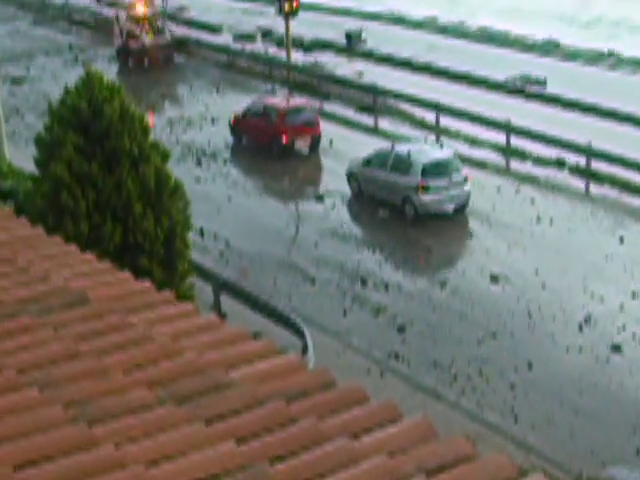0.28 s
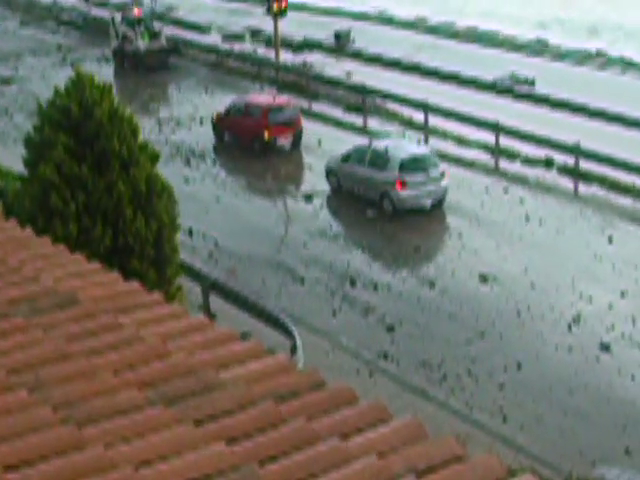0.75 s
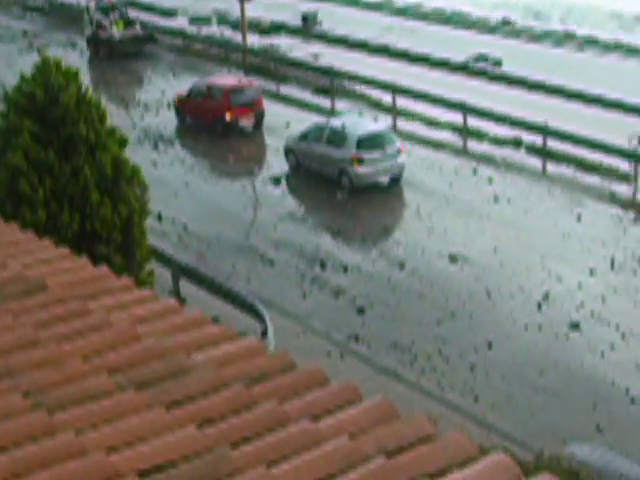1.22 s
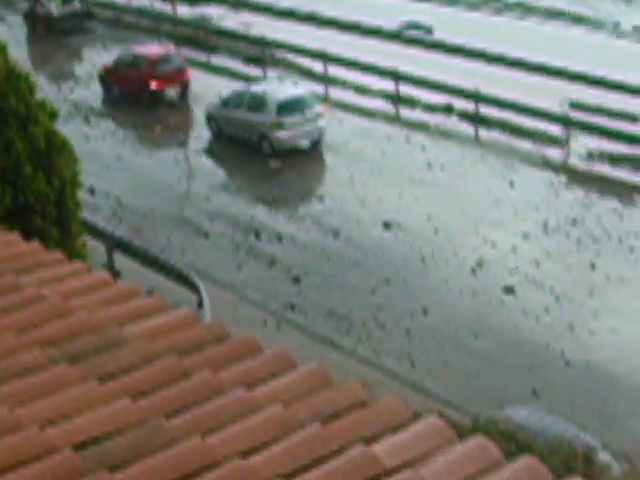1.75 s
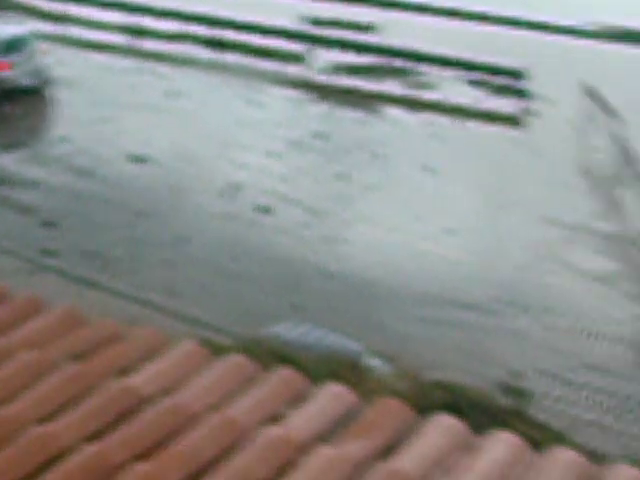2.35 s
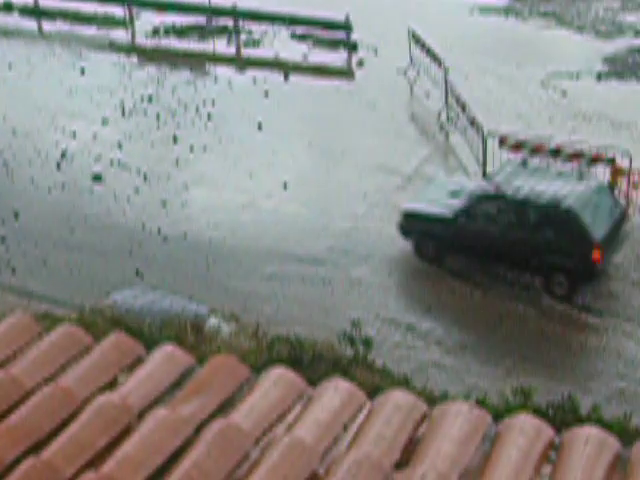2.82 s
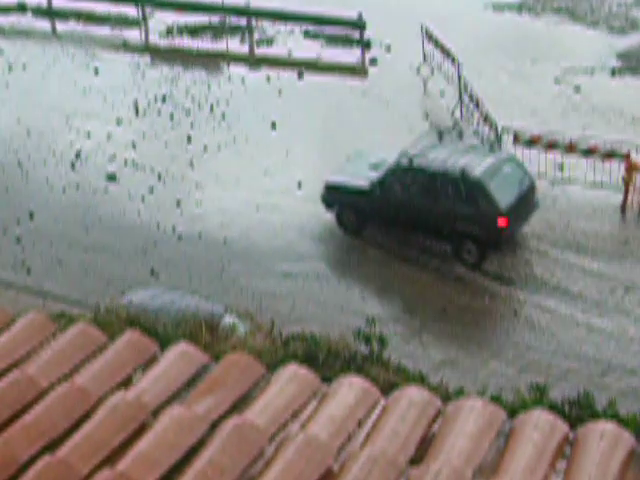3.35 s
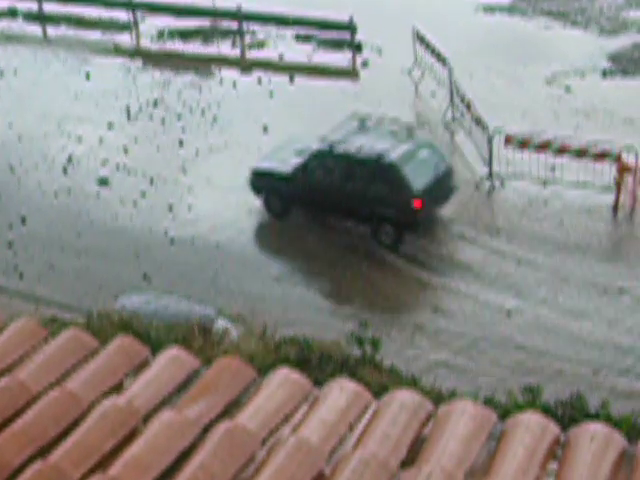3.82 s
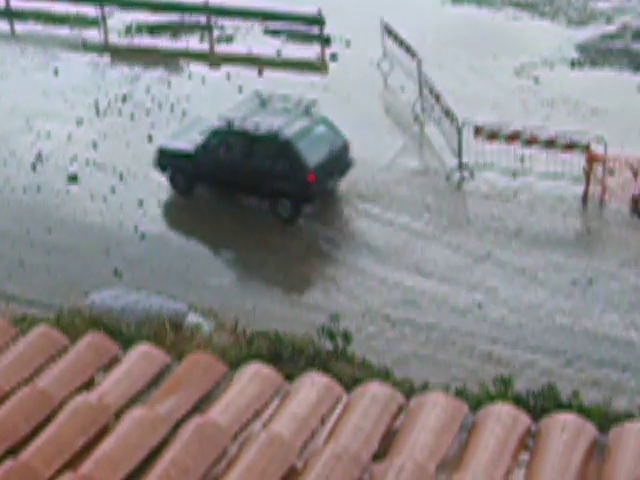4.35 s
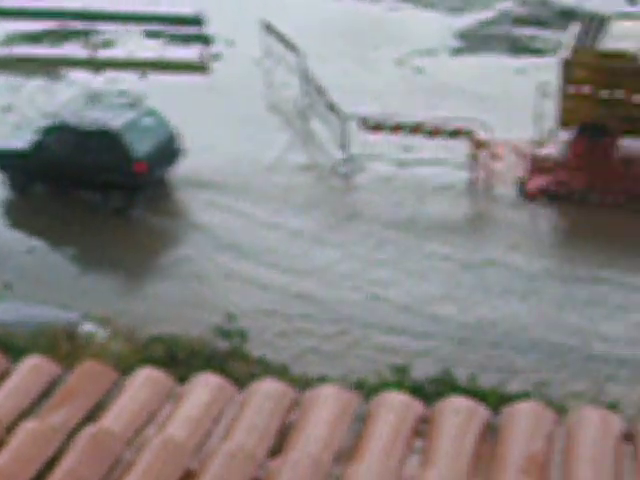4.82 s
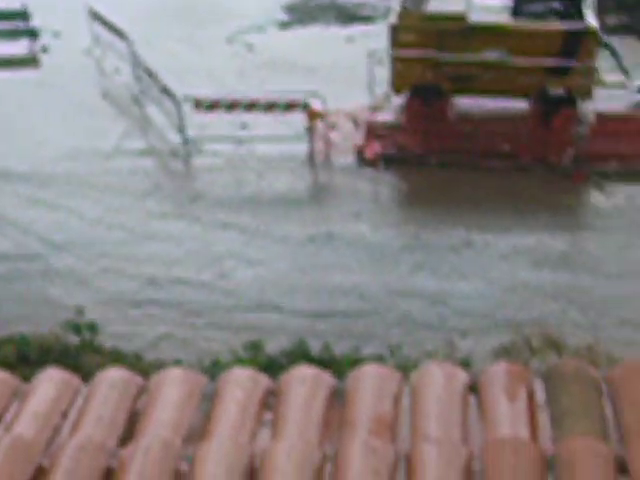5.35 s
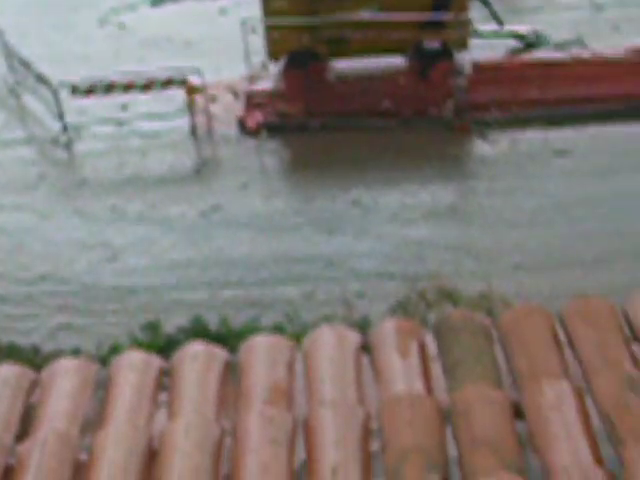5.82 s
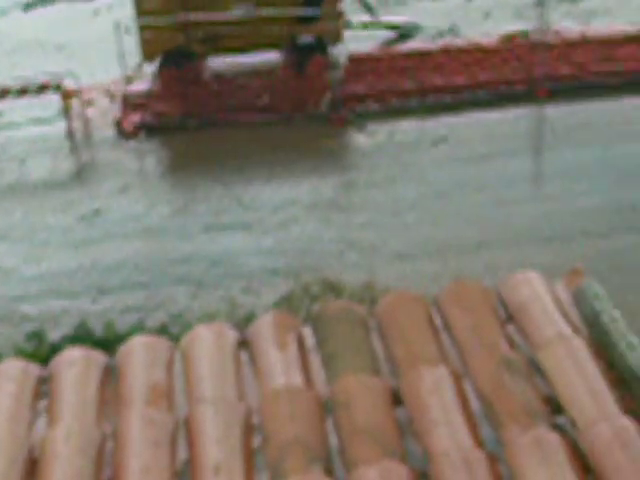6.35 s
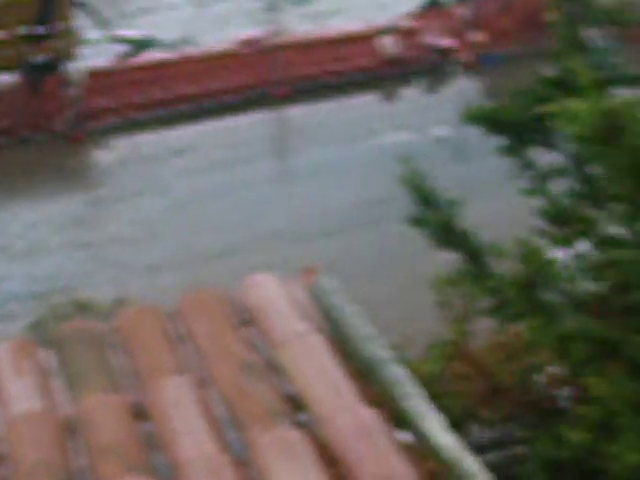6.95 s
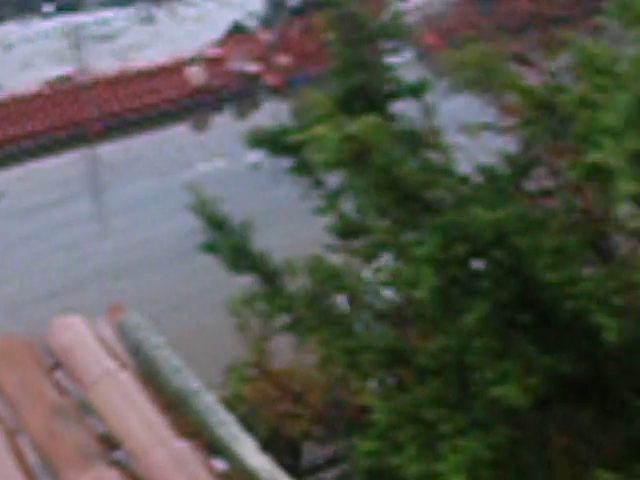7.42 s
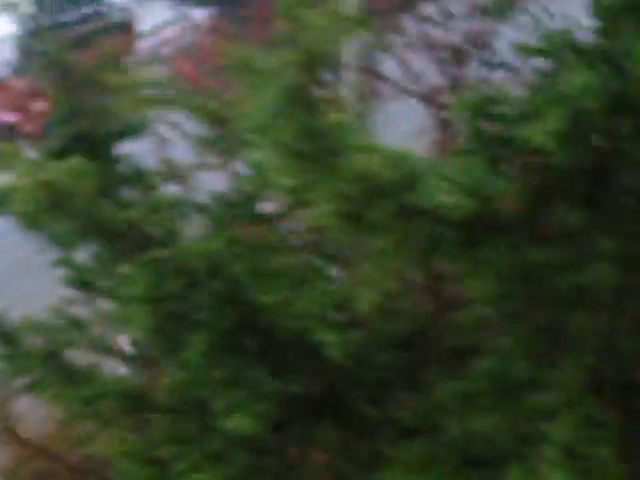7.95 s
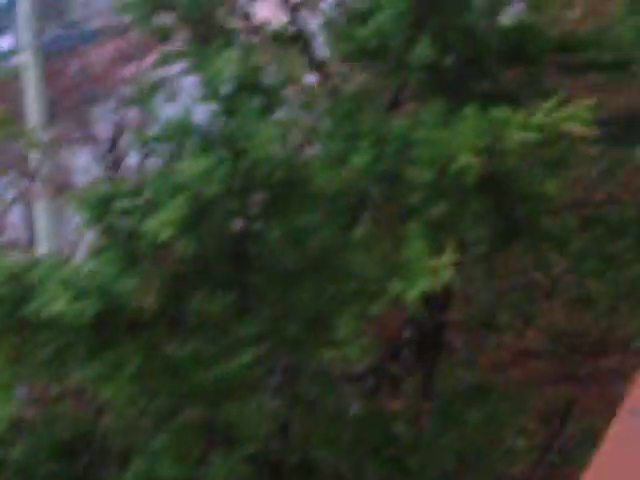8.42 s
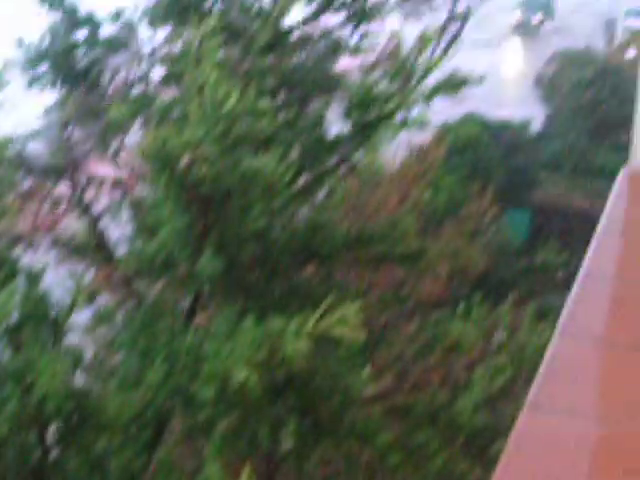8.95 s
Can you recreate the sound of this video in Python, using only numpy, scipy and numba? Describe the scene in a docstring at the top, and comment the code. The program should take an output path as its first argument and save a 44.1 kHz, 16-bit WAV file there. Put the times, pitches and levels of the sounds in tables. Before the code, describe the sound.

Storm surf roars continuously from 0 to about 9.2 s, a thick low-mid rush with deep rumble, seething foam and fine hiss, never falling silent. The spray hiss is strongest in the first second, then recedes. Small surges tumble through at 0.6 to 1.7 s; the sea eases slightly from 2 to 3.3 s. A faint low car engine hum lies underneath, and thin wavering wind whistles in railings appear at the start, from about 1.3 to 6.8 s, and again near 8.7 s. At 3.65 s a broad wave swells against the wall. A short metallic clank, a close double knock, rings at 4.25 s. Quick watery slams follow at 4.7, 4.9, 5.05 (the hardest) and 5.25 s. Rapid surges continue to 7 s, with foam growing brighter towards 8 s. A very short, sharp drop tick comes close by at 8.5 s. The microphone is dull, narrow-band mono, limiting on peaks.

```python
"""Storm surf roars against a seafront wall: waves tumble over one after another on a slow swell.
Shaped noise and random drops make breaker rumble, roar, foam, tyre spray and slams on the wall.
Wavering tones make an engine hum and gusts whistle in the railings.
Metal clanks in decaying modes and a drop ticks close by, a very short sine.
A narrow-band microphone, a peak limiter and a clipper shape the sum."""
import sys
import numpy as np
from scipy import signal
from scipy.fft import rfft, irfft
from scipy.io import wavfile
from scipy.ndimage import uniform_filter1d
from numba import njit

SR = 44100
rng = np.random.default_rng(int(sys.argv[2]) if len(sys.argv) > 2 else 0)


def store_wav(level_fs):
    """Save 16-bit WAV to argv[1]."""
    pcm = np.round(np.clip(np.atleast_2d(level_fs), -1, 1) * 32767)
    wavfile.write(sys.argv[1], SR, pcm.T.astype(np.int16))


N = 405279
TIME_S = np.arange(N) / SR

# slow swell of the sea: start_s, roar_db, rumble_db, foam_db
SWELL = [(0, -15.5, -20, -23), (.42, -17.5, -21, -26.5), (1.05, -15, -17.5, -27), (1.45, -17, -20.5, -29),
         (2.1, -18.5, -23.5, -29), (2.95, -18, -22.5, -27.5), (3.33, -18, -23, -28.5),
         (3.64, -13.5, -17, -27.5), (4.0, -15.5, -17.5, -27), (4.58, -17.5, -19.5, -28),
         (5.15, -17, -18.5, -26.5), (5.65, -15.7, -18.5, -25), (7.1, -15.5, -20, -23.5),
         (8.1, -16.5, -20.5, -22), (8.45, -17, -20, -23.5), (9.19, -16, -19.5, -21.5)]
# single waves tumbling over on the swell: crest_s, rise_db
SURGES = [(.6, 1), (1.02, 1.5), (1.22, 1.5), (1.65, 1.5), (3.76, 2), (4.03, 1), (4.21, 2.5), (4.42, 1.5),
          (4.681, 3), (4.86, 2.5), (5.02, 2.5), (5.28, 2.5), (5.46, 2), (5.8, 2.5), (5.96, 0.5),
          (6.15, 3.5), (6.52, 2), (6.899, 2.5), (7.29, 1), (7.47, 1), (7.74, 0.5), (8.101, 1.5), (8.45, 1),
          (8.65, 2), (8.98, 2.5)]
SURGE_BUILD_S, SURGE_FALL_S = 0.053, 0.054
# spectrum of heavy breakers: freq_hz, gain_db
RUMBLE_COLOUR = [(20, -48), (35, -27), (48, -22), (75, -13), (110, -6), (160, -4.5), (240, 2), (330, 0),
                 (450, -3.5), (700, -19), (1500, -42.5), (4000, -80.5)]
# spectrum of broken surf: freq_hz, gain_db
ROAR_COLOUR = [(30, -57), (150, -27), (320, -7.5), (460, -4.5), (580, 1.5), (760, 0), (920, -3),
               (1100, -6.5), (1350, -21), (2000, -23), (4000, -51.5)]
# spectrum of foam on the road: freq_hz, gain_db
FOAM_COLOUR = [(50, -50), (600, -25.5), (1000, -3.5), (1250, 0.5), (1420, -2), (1580, -0.5), (1850, -3.5),
               (2150, -5), (2600, -7.5), (3200, -11), (4200, -28)]

# waves slamming the wall: peak_s, level_db, build_s, fall_s
SLAMS = [(3.65, -16.5, 0.18, 0.094), (4.73, -18.5, 0.052, 0.015), (4.89, -14.5, 0.065, .012),
         (5.057, -9, 0.024, 0.0051), (5.26, -12.5, 0.034, 0.085)]
# spectrum of a slam: freq_hz, gain_db
SLAM_COLOUR = [(20, -45.5), (120, -7), (260, 2.5), (700, -1.5),
               (1300, -13.0), (3000, -18.0), (4400, -23), (5500, -56.5)]

# spray from tyres and wave crests: start_s, level_db (before SPRAY_TRIM_DB)
SPRAY_LEVEL = [(0, -21.5), (1.15, -25), (2.25, -27), (2.75, -30.5), (3.3, -32.5), (3.7, -29.5),
               (5.1, -31.5), (6.1, -29), (6.25, -30), (6.5, -28), (7.4, -31.5), (8.4, -32), (9.0, -26.5),
               (9.19, -26.5)]
SPRAY_TRIM_DB = -0.5
# spectrum of spray: freq_hz, gain_db
SPRAY_COLOUR = [(100, -51), (1200, -26), (2000, -13), (2400, -1), (2750, 0.5), (3100, -0.5), (3500, -4.5),
                (4300, -6.5), (5500, -45.5)]

# engine on the road: start_s, firing_rate_hz, level_db
ENGINE = [(0, 82.5, -33.5), (1.25, 87, -33), (1.55, 87.96, -38), (4.7, 89.04, -37.5), (5.3, 87.2, -43.5),
          (7.15, 86.1, -33), (7.45, 86.65, -36), (7.9, 87, -33.5), (9.19, 83.8, -33)]
ENGINE_OCTAVE_DB = -4  # second harmonic against the firing note

# gusts in the rails: full_from_s, full_until_s, pitch_hz, level_db
WHISTLES = [(0, 0.296, 887.6, -26.5), (1.6, 3.2, 620, -24), (2.55, 4.4, 949.5, -31),
            (3.597, 5.895, 619.6, -29), (3.6, 4.4, 736.5, -33), (5.694, 6.5, 753.7, -27.5),
            (8.65, 8.995, 625, -28)]
WHISTLE_FADE_S = 0.39  # fade before full_from_s and after full_until_s

# knocks on metal: start_s, level_db
CLANKS = [(4.237, -13.5), (4.258, -21.5)]
# modes of the metal: freq_hz, gain_db, t60_s
CLANK_MODES = [(1183, -3, 0.18), (1370, -12, .2), (1700, -18, 0.14), (2050, -9, .2), (2110, -11, .12),
               (2402, -13, 0.3), (2780, -17, 0.24)]
# spectrum of the crack: freq_hz, gain_db
CRACK_COLOUR = [(300, -15), (900, 3), (2200, 5), (3200, -6), (5000, -45)]

# drop near the microphone: start_s, level_db, pitch_hz, t60_s
DROPS = [(8.5141, 3.5, 2850, .0022)]

# treble response of the microphone: freq_hz, gain_db
MICROPHONE = [(2900, 0.5), (3150, -0.5), (3400, -6), (3650, -11), (3950, -17), (4200, -25.5), (4450, -41.5)]
TOP_HZ = 15800  # lowpass after the clipper


def undb(db):
    """Decibels to gain."""
    return 10 ** (np.asarray(db) / 20)


def unit(x):
    """Scale to rms 1."""
    return x / np.sqrt(np.mean(x ** 2))


def curves(table):
    """Interpolate each column of a timed table, sample by sample."""
    start_s, *columns = np.transpose(table)
    return [np.interp(TIME_S, start_s, column) for column in columns]


def response(colour):
    """Gain of a spectral outline at every frequency bin, dB linear over log frequency."""
    outline_hz, gain_db = np.transpose(colour)
    bin_hz = np.fft.rfftfreq(N, 1 / SR)
    return undb(np.interp(np.log(bin_hz + 1), np.log(outline_hz), gain_db))


def shape(x, colour):
    """Filter a signal by a spectral outline."""
    return irfft(rfft(x) * response(colour), N)


def walk(rate_hz):
    """Random wandering at rms 1: straight lines between rate_hz random points a second."""
    points = rng.standard_normal(1200)
    return unit(np.interp(TIME_S * rate_hz, np.arange(len(points)), points))


def fade(start_s, t60_s):
    """Silent until start_s, then dying away by 60 dB in t60_s."""
    age_s = np.maximum(TIME_S - start_s, 0)
    return (TIME_S > start_s) * np.exp(-np.log(1000) * age_s / t60_s)


def hump(peak_s, build_s, fall_s):
    """Gaussian rise to 1 at peak_s and Gaussian fall, each with its own width."""
    distance = np.maximum((peak_s - TIME_S) / build_s, (TIME_S - peak_s) / fall_s)
    return np.exp(-distance ** 2)


def water(colour, drops_per_s, drop_share, churn_db, churn_rate_hz, count=9):
    """Bursting bubbles and drops of uneven size over noise; each octave churns on its own."""
    size = rng.lognormal(0, .5, N)
    drops = (rng.random(N) < drops_per_s / SR) * size * rng.choice([-1, 1], N)
    share = np.clip(drop_share, 0, 1)  # by power
    mix = np.sqrt(share) * unit(drops) + np.sqrt(1 - share) * rng.standard_normal(N)
    spectrum = rfft(mix) * response(colour)
    # overlapping triangular octave bands, counted from 20 Hz
    octave = np.clip(np.log2((np.fft.rfftfreq(N, 1 / SR) + 1) / 20), 0, count - 1)
    out = 0
    for k in range(count):
        band = irfft(spectrum * np.maximum(1 - abs(octave - k), 0), N)
        out = out + band * undb(churn_db * walk(churn_rate_hz))
    return unit(out)


def tone(pitch_hz, waver, waver_rate_hz, flutter_db):
    """Sine whose pitch (by the fraction waver) and strength wander at random."""
    wavering_hz = pitch_hz * (1 + waver * walk(waver_rate_hz))
    phase = 2 * np.pi * np.cumsum(wavering_hz) / SR
    return unit(np.sin(phase)) * undb(flutter_db * walk(7))


def sea():
    """Heavy water rumbles, broken surf roars, foam seethes on the road; all heave with each wave."""
    roar_db, rumble_db, foam_db = curves(SWELL)
    rumble = water(RUMBLE_COLOUR, drops_per_s=300, drop_share=.25, churn_db=1.2, churn_rate_hz=12)
    roar = water(ROAR_COLOUR, drops_per_s=900, drop_share=0.28, churn_db=0.28, churn_rate_hz=18)
    foam = water(FOAM_COLOUR, drops_per_s=1400, drop_share=0.29, churn_db=0.42, churn_rate_hz=24)
    surge_db = sum(rise_db * hump(crest_s, SURGE_BUILD_S, SURGE_FALL_S) for crest_s, rise_db in SURGES)
    heave_db = .5 * walk(13)
    layers = rumble * undb(rumble_db) + roar * undb(roar_db) + foam * undb(foam_db)
    return undb(surge_db + heave_db) * layers


def slams():
    """Each wave piles up against the wall and bursts in a broad thud."""
    level = sum(undb(db) * hump(peak_s, build_s, fall_s) for peak_s, db, build_s, fall_s in SLAMS)
    return level * water(SLAM_COLOUR, drops_per_s=1400, drop_share=0.52, churn_db=4.5, churn_rate_hz=27)


def spray():
    """Fine drops from tyres and wave crests hiss, dense and high, at a drifting level."""
    level_db, = curves(SPRAY_LEVEL)
    hiss = water(SPRAY_COLOUR, drops_per_s=2500, drop_share=0.45, churn_db=.5, churn_rate_hz=20)
    return hiss * undb(level_db + SPRAY_TRIM_DB)


def engine():
    """A car creeps through the flood: only its firing note and the octave carry over the surf."""
    firing_hz, level_db = curves(ENGINE)
    note = tone(firing_hz, waver=.03, waver_rate_hz=22, flutter_db=1.5)
    octave = tone(2 * firing_hz, waver=.025, waver_rate_hz=22, flutter_db=1.5)
    return undb(level_db) * (note + undb(ENGINE_OCTAVE_DB) * octave)


def whistles():
    """Each gust brings up the note of one rail, holds it and lets it die."""
    out = 0
    for full_from_s, full_until_s, pitch_hz, level_db in WHISTLES:
        inside_s = np.minimum(TIME_S - full_from_s, full_until_s - TIME_S)
        gust = np.clip(1 + inside_s / WHISTLE_FADE_S, 0, 1)
        note = tone(pitch_hz, waver=.004, waver_rate_hz=25, flutter_db=2.64)
        out = out + undb(level_db) * gust * note
    return out


def clank():
    """A loose metal barrier is knocked: a noise crack, then modes blurred by random phase."""
    crack = unit(shape(rng.standard_normal(N), CRACK_COLOUR))
    out = sum(undb(db) * crack * fade(start_s, t60_s=0.05) for start_s, db in CLANKS)
    for mode_hz, mode_db, t60_s in CLANK_MODES:
        ring = np.sin(2 * np.pi * mode_hz * TIME_S + 0.78 * walk(110))
        out = out + sum(undb(db + mode_db) * ring * fade(start_s, t60_s) for start_s, db in CLANKS)
    return out


def drips():
    """A drop ticks on something hard beside the microphone and dies within a few cycles."""
    out = 0
    for start_s, level_db, pitch_hz, t60_s in DROPS:
        ring = np.sin(2 * np.pi * pitch_hz * (TIME_S - start_s))
        out = out + undb(level_db) * ring * fade(start_s, t60_s)
    return out


def scene():
    """Sea, road, wind and small knocks together, as one channel."""
    return (sea() + spray() + slams() + engine() + whistles() + clank() + drips())[None]


@njit
def peak_follower(x, attack, release):
    """Climb quickly to each peak and sink back slowly; both rates are fractions per sample."""
    held, level = np.empty(len(x)), 0.
    for i in range(len(x)):
        level += (abs(x[i]) - level) * (attack if abs(x[i]) > level else release)
        held[i] = level
    return held


def record(dry, threshold=0.7, attack_s=.00007, release_s=0.23):
    """Dull narrow-band microphone, limiter that ducks after each peak, clipping of what gets past."""
    narrow = signal.ellip(10, .2, 80, 4450, fs=SR, output="sos")
    heard = signal.sosfilt(narrow, shape(dry[0], MICROPHONE))
    held = peak_follower(heard, min(1 / (attack_s * SR), 1), 1 / (release_s * SR))
    gain = uniform_filter1d(threshold / np.maximum(held, threshold), size=16)
    clipped = np.clip(heard * gain, -.73, .76)  # slightly lopsided
    top = signal.ellip(8, .2, 70, TOP_HZ, fs=SR, output="sos")
    return signal.sosfilt(top, clipped)[None]


dry = scene()
out = record(dry)
store_wav(out)
```